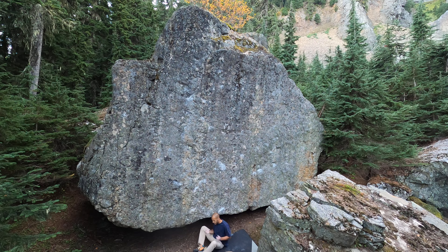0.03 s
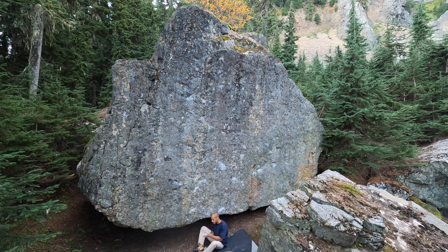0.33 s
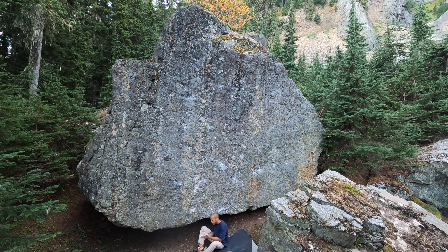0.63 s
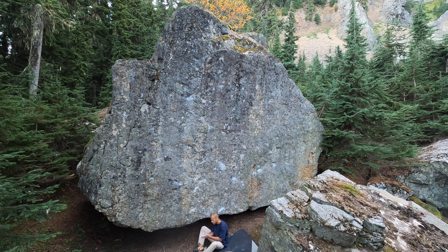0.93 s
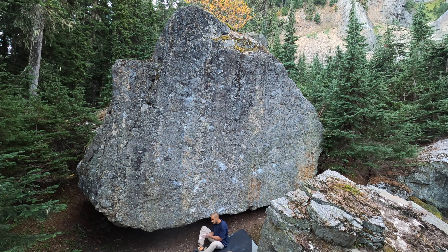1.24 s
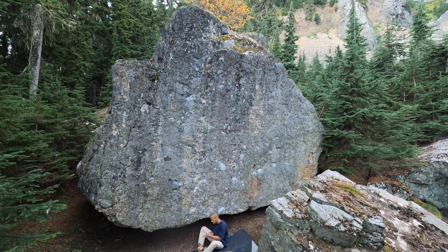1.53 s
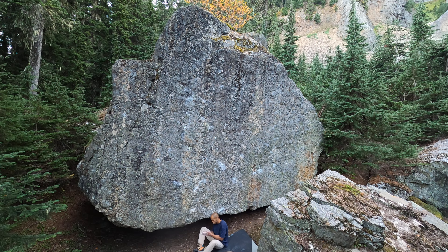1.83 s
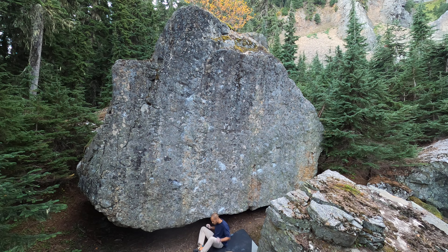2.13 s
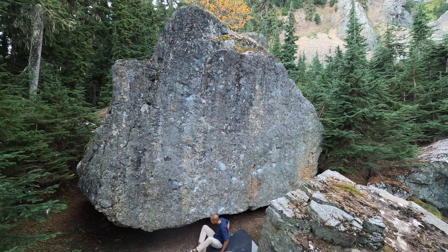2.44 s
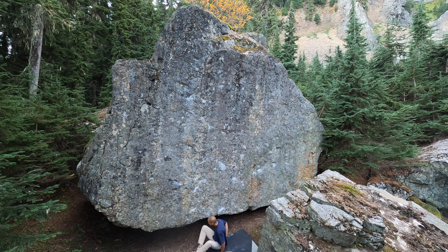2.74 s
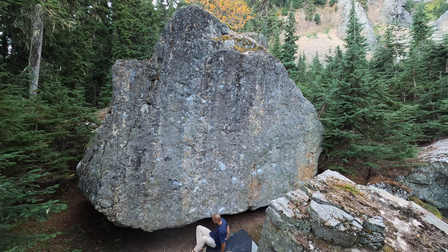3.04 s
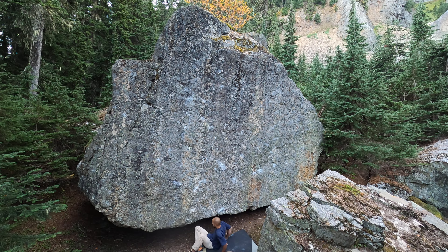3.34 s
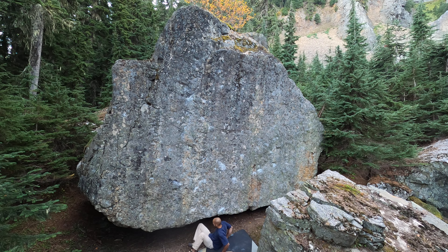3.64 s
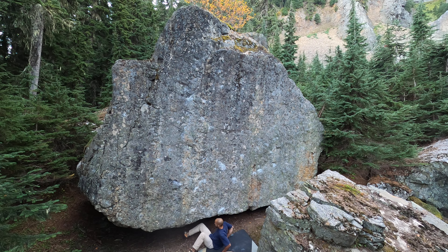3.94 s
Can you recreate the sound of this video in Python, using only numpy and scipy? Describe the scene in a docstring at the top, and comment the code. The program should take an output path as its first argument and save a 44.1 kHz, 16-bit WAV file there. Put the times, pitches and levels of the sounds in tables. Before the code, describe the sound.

Quick, dry rubbing strokes, then clothes scuffing, over distant engines and a low outdoor rumble.

```python
"""Under a boulder in a forest, a climber rubs something with nine quick, dry strokes, then shifts round
on the mat: clothes scuff and slide, and grit ticks. Friction is a dense train of tiny impacts, heard as
noise that swells with the speed of the hand. Far off in the valley one engine drones and another rises
and falls, each a set of partials tied to its firing rate. Behind them lie a steady rumble, a hollow
roar off the slopes, a rushing noise and the faint hiss of the trees."""
import sys
import numpy as np
from scipy import signal
from scipy.fft import rfft, irfft
from scipy.io import wavfile
from scipy.ndimage import uniform_filter1d, map_coordinates

SR = 44100
rng = np.random.default_rng(int(sys.argv[2]) if len(sys.argv) > 2 else 0)


def output_pcm(signal):
    """Save a mono or channel-first signal as 16-bit PCM at the path in sys.argv[1].

    Samples are clipped to [-1, 1] before scaling.
    """
    pcm = np.clip(np.atleast_2d(signal).T, -1, 1) * 32767
    wavfile.write(sys.argv[1], SR, np.round(pcm).astype(np.int16))


N = 176400

# Background noise spectra (f/Hz, relative density/dB)
RUMBLE_SPECTRUM = [(15, -39.5), (33, -32.5), (46, -5.5), (56, -7), (72, 1), (120, 2.5), (190, -2.5),
                   (270, -4.5), (340, -14.5), (450, -17.5), (700, -37.5), (1500, -74.5), (5000, -100)]
RUSH_SPECTRUM = [(150, 2.5), (330, -0.5), (450, -1.5), (560, 0.5), (700, 0.5), (850, -9.5), (1020, -5),
                 (1400, -9), (1900, -19), (2600, -29.5), (3800, -41), (6000, -44), (12000, -70)]
ROAR_SPECTRUM = [(170, -19), (280, 7.5), (350, 7.5), (460, -7), (580, -4), (850, -15.5), (1200, -13),
                 (5000, -90)]
TREE_SPECTRUM = [(2000, 2.5), (5500, -0.5), (9000, -7), (11000, -20.5), (15000, -32.5)]
# Their envelopes (t/s, level/dB)
RUMBLE_LEVEL = [(0, -54), (.4, -45), (1.8, -45.5), (2.6, -41.5), (4, -46)]
RUSH_LEVEL = [(0, -56.5), (.4, -51), (1.2, -53.5), (1.9, -52.5), (2.3, -51.5), (2.8, -50.5), (3.3, -53),
              (3.65, -49), (4, -52)]
ROAR_LEVEL = [(0, -52.5), (.3, -47.5), (.5, -50), (.8, -56), (1.47, -54.5), (1.6, -60.5), (2.85, -57),
              (3.05, -63), (3.85, -54.5)]
TREE_LEVEL = [(0, -80), (.45, -87.5), (2.6, -82), (3.4, -80), (3.75, -88), (4, -83.5)]
# Direction of the rushing noise (f/Hz, left minus right/dB)
RUSH_PAN = [(100, 2.5), (370, 8), (700, 6.5), (2400, 6), (9000, 5)]
# Its diffuseness (f/Hz, ratio of side to mid)
RUSH_SPREAD = [(100, .08), (400, 0.16), (700, 0.35), (1400, 0.72), (3000, 0.83), (8000, 0.54)]

# Firing rates of the droning and the labouring engine (t/s, f/Hz)
DRONE_FIRING = [(0, 78.5), (1, 78), (1.4, 76.5), (2.6, 76.5), (3.4, 76.5), (4, 77)]
LABOUR_FIRING = [(0, 132.7), (.45, 129.9), (1, 119.3), (1.35, 111), (1.65, 103), (1.85, 106), (2.05, 113.1),
                 (2.3, 126), (2.55, 130.6), (3.05, 127.6), (3.35, 121.1), (3.7, 109), (4, 109.7)]
# Overtones of the drone (multiple of the cycle rate, relative level/dB)
DRONE_ORDERS = [(12, -5), (14, -7), (15, -4), (17, -14), (22, -23.5), (28, -22.5)]
# Higher engine whines (nominal f/Hz, relative level/dB)
WHINE_PARTIALS = [(285, -4.5), (260, -7), (310.4, -4), (340.5, -8.5), (421.5, -13.5), (547.7, -14.5)]
# Their common glide (t/s, frequency ratio)
WHINE_GLIDE = [(0, 1.01), (1, .985), (4, .99)]
# Envelopes of the engine partials and of a thin far tone (t/s, level/dB)
DRONE_LEVEL = [(0, -75), (.45, -58), (.6, -44), (.73, -52), (.97, -42.5), (1.07, -58), (1.2, -47),
               (1.45, -46.5), (1.8, -41.5), (2.3, -38.5), (2.42, -42.5), (2.8, -35.5), (3.05, -38),
               (3.4, -35.5), (3.57, -40.5), (3.85, -39.5), (4, -37.5)]
ORDERS_LEVEL = [(0, -49.5), (1.3, -52.5), (1.9, -40.5), (4, -42)]
LABOUR_LEVEL = [(0, -51), (.12, -43.5), (.25, -53), (.45, -41), (.72, -48.5), (.95, -42), (1.12, -54.5),
                (1.3, -41.5), (1.47, -41), (1.6, -48.5), (1.85, -39), (2.25, -48), (2.58, -41), (2.8, -48),
                (3.35, -40.5), (3.55, -55.5), (3.82, -36.5), (4, -39)]
OCTAVE_LEVEL = [(0, -60.5), (.5, -53), (1, -63.5), (1.8, -60.5), (2.3, -53), (2.7, -50.5), (3.15, -59.5),
                (3.32, -47), (3.42, -56), (4, -56.5)]
WHINE_LEVEL = [(0, -61), (.3, -48.5), (.7, -56), (1.4, -54.5), (1.7, -58.5), (4, -67.5)]
TONE_LEVEL = [(0, -66), (1.2, -67), (1.85, -59), (2.4, -71)]

# Swells of friction from clothes and mat (peak t/s, rise/s, fall/s, level/dB)
CLOTH_SCUFFS = [(2.075, .05, .09, -69.5), (2.345, 0.1, 0.069, -65.5), (2.505, 0.076, 0.12, -65.5),
                (2.68, 0.083, .05, -73), (2.757, 0.019, 0.059, -69), (3.48, 0.1, 0.076, -70.5),
                (3.59, 0.13, .06, -67.5), (3.63, 0.035, 0.044, -60.5)]
LAST_SWIPE = [(3.643, .014, .022, -71)]
MAT_SLIDES = [(2.505, 0.039, 0.088, -61), (2.81, 0.063, .08, -70.5), (2.97, .13, 0.19, -60),
              (3.08, 0.31, .25, -58), (3.25, 0.074, 0.054, -66), (3.60, 0.13, 0.093, -64.5)]
MAT_DRAGS = [(2.505, 0.026, .04, -60), (2.82, .07, .05, -59.5), (2.95, 0.022, 0.039, -54.5),
             (3.635, .04, 0.045, -61)]
WEAVE_RASPS = [(3.05, 0.18, 0.24, -68)]
# Their spectra (f/Hz, relative density/dB)
CLOTH_SPECTRUM = [(1200, 10), (2500, -2.5), (4000, -3), (5500, -0.5), (7200, -5.5), (9200, -7.5),
                  (11000, -19), (14000, -26)]
SLIDE_SPECTRUM = [(400, -0.5), (1000, 10.5), (1800, 4.5), (2500, -0.5), (3150, -1), (4300, -5.5),
                  (6000, -10.5), (9000, -18), (11000, -32), (14000, -40)]
DRAG_SPECTRUM = [(400, -22), (750, -0.5), (1050, 2), (1500, -11.5), (2300, -17), (5000, -48.5)]
WEAVE_SPECTRUM = [(1700, -31), (3200, 0), (4200, -8.5), (8000, -43)]
# Impacts of grit (t/s, level/dB)
GRIT_TICKS = [(2.681, -75), (2.701, -74)]

# Rubbing strokes (start t/s, length/s, fraction of the stroke at which the hand is fastest,
# level/dB, rasp weight/dB, ring weight/dB, ring f/Hz)
STROKES = [(0.537, 0.19, 0.44, -71, -11, -12, 5640), (0.712, 0.14, 0.64, -71, -16, -8, 5500),
           (.851, 0.17, 0.62, -70.5, -16, -4, 5200), (1.013, 0.17, 0.67, -69.5, -13, -4.5, 5130),
           (1.191, 0.18, 0.66, -66.5, 2, -11.5, 5420), (1.375, 0.2, 0.54, -66, 1.5, -9.5, 4900),
           (1.581, 0.14, 0.7, -65, 3, -11, 4780), (1.719, .14, .6, -65.5, 1.5, -11, 5226),
           (1.85, .18, 0.54, -62, -1, -15, 4620)]
# Bright hiss, lower rasp and narrow ring of a stroke (f/Hz, relative density/dB)
HISS_SPECTRUM = [(2000, -10.5), (3800, -2), (5200, 1), (7000, -1), (9000, -2), (11000, -9.5),
                 (12600, -12.5), (15000, -26)]
RASP_SPECTRUM = [(700, -7), (1500, 11), (2500, 2.5), (3800, 2.5), (5500, -21), (13000, -36)]
RING_SPECTRUM = [(3000, -39), (4450, -15), (5100, -2.5), (5650, -5.5), (6600, -17), (10000, -39)]
# Direction of the rubbing (f/Hz, left minus right/dB)
RUB_PAN = [(1500, 2), (3000, 0.5), (7300, -0.5), (8150, -7), (9700, -4), (14000, -5.5)]

TIME = np.arange(N) / SR


def undb(db):
    """The decibel is logarithmic: 20 dB is a tenfold amplitude."""
    return 10 ** (np.asarray(db) / 20)


def curve(rows):
    """Linear interpolation in time."""
    return np.interp(TIME, *np.array(rows, float).T)


def over_bins(rows):
    """Interpolation over the spectrum on a logarithmic frequency axis."""
    hz, value = np.array(rows, float).T
    bin_hz = np.maximum(np.arange(N // 2 + 1) * SR / N, 1)
    return np.interp(np.log(bin_hz), np.log(hz), value)


def walk(rate_hz):
    """Low-pass filtering of random steps gives a smooth fluctuation of unit deviation."""
    hold = int(SR / rate_hz)
    steps = np.repeat(rng.standard_normal(N // hold + 1), hold)
    smooth = uniform_filter1d(uniform_filter1d(steps, hold), hold)[:N]
    return smooth / smooth.std()


def stereo_noise(spectrum, pan_db, spread, grain=0):
    """Dense tiny impacts superpose as noise; grain varies their size, spread adds a diffuse part."""
    size = np.exp(grain * np.repeat(rng.standard_normal(N // 24 + 1), 24)[:N])
    mid, side = rfft(rng.standard_normal((2, N)) * size) * undb(over_bins(spectrum))
    sign = np.array([[1], [-1]])
    pair = irfft((mid + sign * spread * side) * undb(sign * pan_db / 2), N)
    return pair / pair.mean(axis=0).std()


def valley():
    """Incoherent noises add in power: rumble, rush from the left, roar off the slopes, hiss of trees."""
    rumble = undb(curve(RUMBLE_LEVEL) + .8 * walk(9))
    rumble = rumble * stereo_noise(RUMBLE_SPECTRUM, pan_db=1, spread=.022)
    rush = undb(curve(RUSH_LEVEL) + .75 * walk(11))
    rush = rush * stereo_noise(RUSH_SPECTRUM, over_bins(RUSH_PAN), over_bins(RUSH_SPREAD))
    roar = undb(curve(ROAR_LEVEL) + .88 * walk(14))
    roar = roar * stereo_noise(ROAR_SPECTRUM, pan_db=1.5, spread=.18)
    trees = undb(curve(TREE_LEVEL)) * stereo_noise(TREE_SPECTRUM, pan_db=-2.5, spread=.94)
    return rumble + rush + roar + trees


def partial(hz, scatter=0, waver=.00304, fading_hz=14):
    """Multipath fading: a tone wavers in the air, and the share scattered by slopes fades at random."""
    cycles = np.cumsum(hz * (1 + waver * walk(5.91))) / SR + rng.random()
    direct = np.sqrt(2 * (1 - scatter))
    scattered = np.sqrt(scatter) * (walk(fading_hz) + 1j * walk(fading_hz))
    return np.imag((direct + scattered) * np.exp(2j * np.pi * cycles))


def far_whines(scatter=.78, tone_hz=512.54):
    """Scattered paths interfere, so the dying engine whines and a thin tone above them flutter."""
    glide = .99 * curve(WHINE_GLIDE)  # 1 % below nominal pitch
    whines = sum(undb(db) * partial(hz * glide, scatter) for hz, db in WHINE_PARTIALS)
    return undb(curve(WHINE_LEVEL)) * whines + undb(curve(TONE_LEVEL)) * partial(tone_hz, scatter)


def droning_engine(cylinders=6):
    """Periodic firing radiates multiples of the cycle rate, of which only the low ones carry far."""
    firing_hz = curve(DRONE_FIRING)
    cycle_hz = firing_hz / cylinders
    hum = partial(.99 * firing_hz)  # 1 % below the firing rate
    overtones = sum(undb(db) * partial(order * cycle_hz) for order, db in DRONE_ORDERS)
    return undb(curve(DRONE_LEVEL)) * hum + undb(curve(ORDERS_LEVEL)) * overtones


def labouring_engine():
    """Harmonics follow the firing rate: fundamental and octave rise and fall together."""
    firing_hz = curve(LABOUR_FIRING)
    fundamental = undb(curve(LABOUR_LEVEL)) * partial(firing_hz)
    octave = undb(curve(OCTAVE_LEVEL)) * partial(2 * firing_hz, scatter=.39)
    return fundamental + octave


def swells(rows):
    """Contact pressure builds to a peak and lets go, once a row; overlapping swells add in power."""
    power = 0
    for peak, rise, fall, db in rows:
        offset = np.clip((TIME - peak) / np.where(TIME < peak, rise, fall), -1, 1)
        power = power + (undb(db) * np.cos(np.pi / 2 * offset)) ** 2
    return np.sqrt(power)


def fabric_noise(spectrum, pan_db):
    """Friction of fabric: slightly grainy, partly diffuse noise."""
    return stereo_noise(spectrum, pan_db, spread=.46, grain=.13)


def clothes_and_grit(tick_decay_s=.0018):
    """Sliding friction gives scuffs and a last bright swipe; impacts of grit decay exponentially."""
    ticks = sum(undb(db) * (TIME >= at) * np.exp(-np.abs(TIME - at) / tick_decay_s)
                for at, db in GRIT_TICKS)
    scuffs = swells(CLOTH_SCUFFS) * undb(1.3 * walk(60))
    swipe = swells(LAST_SWIPE) * fabric_noise(HISS_SPECTRUM, over_bins(RUB_PAN))
    return (scuffs + ticks) * fabric_noise(CLOTH_SPECTRUM, pan_db=-2) + swipe


def mat(pan_db=.5):
    """Friction under load: weight slides and drags dully on the mat, and fabric rasps over its weave."""
    slide = swells(MAT_SLIDES) * undb(.7 * walk(40)) * fabric_noise(SLIDE_SPECTRUM, pan_db)
    drag = swells(MAT_DRAGS) * fabric_noise(DRAG_SPECTRUM, pan_db)
    weave = swells(WEAVE_RASPS) * fabric_noise(WEAVE_SPECTRUM, pan_db)
    return slide + drag + weave


def linger(envelope, decay_s=.041, tail_db=-13.5):
    """Reverberation: reflections from rock and trees add an exponential tail to an envelope's power."""
    pole = np.exp(-1 / (decay_s * SR))
    tail = signal.lfilter([1 - pole], [1, -pole], envelope ** 2)
    return np.sqrt(envelope ** 2 + undb(tail_db) ** 2 * tail)


def rubbing(speed_exponent=1.6, hiss_lead=.3, rasp_trim_db=-4.5, ring_reference_hz=5200):
    """Friction noise grows with speed; firm strokes rasp, light ones ring at a pitch set by the grip."""
    hiss_envelope = rasp_envelope = ring_envelope = 0
    for start, length, fastest, db, rasp_db, ring_db, _ in STROKES:
        travel = np.interp((TIME - start) / length, [0, fastest, 1], [0, .5, 1])
        speed = np.abs(np.sin(np.pi * travel))
        push = undb(db) * speed ** speed_exponent
        hiss_envelope += push * (1 + hiss_lead * (1 - 2 * travel))  # strongest early
        rasp_envelope += push * speed ** 2 * undb(rasp_db + rasp_trim_db)
        ring_envelope += push * 2 * travel * undb(ring_db)  # strongest late
    hiss, rasp, ring = (stereo_noise(spectrum, over_bins(RUB_PAN), spread=.49, grain=.11)
                        for spectrum in (HISS_SPECTRUM, RASP_SPECTRUM, RING_SPECTRUM))
    ring_hz = curve([(start + length / 2, hz) for start, length, *_, hz in STROKES])
    position = np.cumsum(ring_hz / ring_reference_hz)  # resampling moves the ring to each stroke's pitch
    ring = np.array([map_coordinates(channel, [position], mode="mirror") for channel in ring])
    strokes = linger(hiss_envelope) * hiss + linger(rasp_envelope) * rasp + linger(ring_envelope) * ring
    return strokes * undb(1.4 * walk(70.06))  # the level flickers


def scene():
    """Superposition: the pressures of far and near sources add."""
    background = valley()
    engine_pan = undb([[.2], [-.2]])  # barely left of centre
    engines = (far_whines() + droning_engine() + labouring_engine()) * engine_pan
    return background + engines + clothes_and_grit() + mat() + rubbing()


def record(dry, bottom_hz=28, top_hz=15100):
    """Arrival delay and band limiting: the left microphone lags a sample; deep bass and top are cut."""
    pair = np.array([np.append(0, dry[0, :-1]), dry[1]])
    pair = signal.sosfilt(signal.butter(3, bottom_hz, "high", fs=SR, output="sos"), pair)
    return signal.sosfilt(signal.ellip(8, .2, 70, top_hz, fs=SR, output="sos"), pair)


dry = scene()
out = record(dry)
output_pcm(out)
```